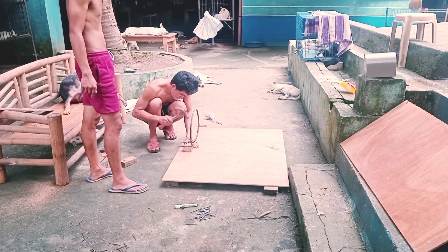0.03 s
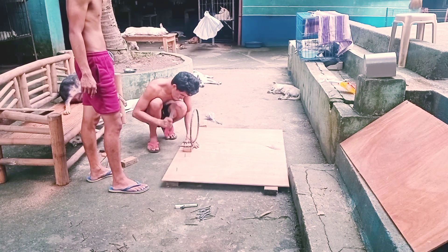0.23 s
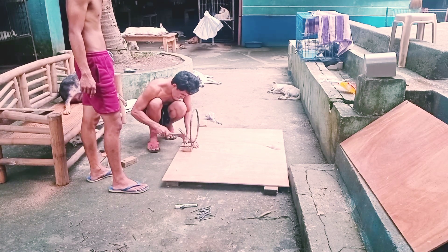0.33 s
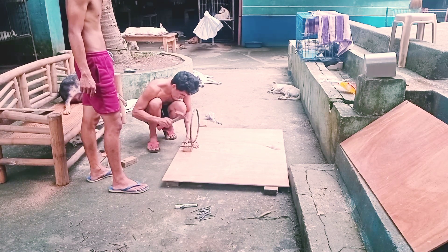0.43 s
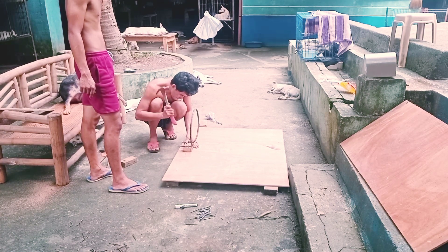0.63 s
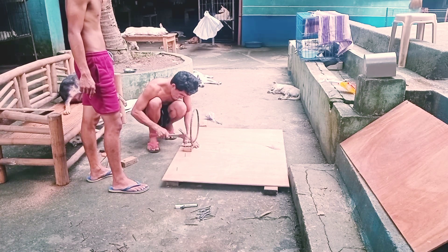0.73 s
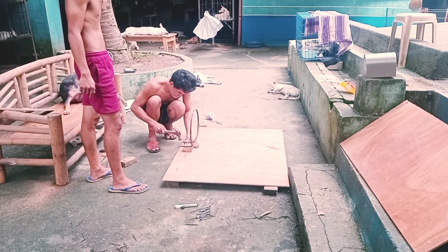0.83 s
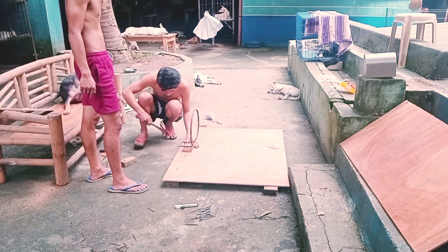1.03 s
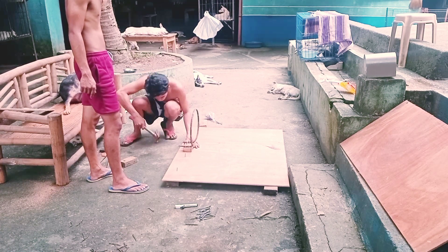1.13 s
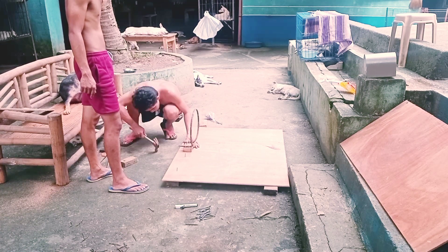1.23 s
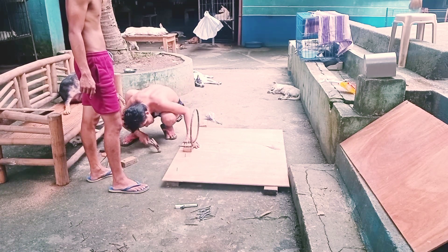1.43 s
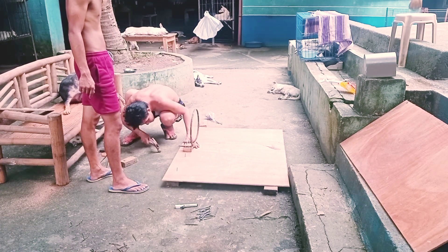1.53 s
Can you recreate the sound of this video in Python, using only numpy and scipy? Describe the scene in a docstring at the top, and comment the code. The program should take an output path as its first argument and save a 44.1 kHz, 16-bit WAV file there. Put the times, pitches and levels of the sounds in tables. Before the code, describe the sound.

A hammer bangs metal on a booming wooden sheet, followed by two light knocks.

```python
"""Hammering in a concrete yard

A hammer strikes a metal fitting on a plywood sheet in an even rhythm. Each blow cracks and clanks,
the sheet's modes boom and the walls reverberate, all held flat by a fast limiter. After a soft scuff,
tools are set down with two light knocks and faint clinks, over a low rumble and a thin hiss."""
import sys
import numpy as np
from scipy import signal
from scipy.fft import rfft, irfft, next_fast_len
from scipy.io import wavfile
from scipy.ndimage import uniform_filter1d

SR = 44100
rng = np.random.default_rng(int(sys.argv[2]) if len(sys.argv) > 2 else 0)


def dump_mix(stems):
    """Bounce the given channels to the path in sys.argv[1] as a 16-bit WAV at rate SR."""
    frames = np.atleast_2d(stems).T  # one column per channel
    limited = np.clip(frames, -1, 1)  # hard clip at full scale
    pcm = np.round(limited * 32767).astype(np.int16)
    wavfile.write(sys.argv[1], SR, pcm)


N = 70560
CRACK_RISE_S, YARD_RISE_S = 0.0036, 0.0076
SIDES = np.array([[0.5], [-0.5]])  # shares a difference between left and right

# The microphone pair. Each row: frequency in Hz, coherence, left minus right in dB, left lead in radians.
MIC_PAIR = [(31.1, 0, 1.5, 0), (103.4, .94, -0.5, 0), (352, 0.62, 0.9, 0.063), (594, 0.51, 0.2, 0.14),
            (1160, .55, 1, 1.3), (2250, 0, -0.5, 0.69), (5100, .05, 0.5, 2.2), (8640, 0.17, -9, 4.3),
            (9800, 0.18, 3.5, 1.5), (10900, 0.25, 14.5, 0.0026), (14400, 0.16, 1, 0.51)]


def amp(db):
    """Amplitude grows tenfold for every 20 dB."""
    return 10 ** (np.asarray(db) / 20)


def read(table, hz, column=1):
    """Interpolation of one column on a logarithmic frequency scale."""
    columns = np.transpose(table)
    return np.interp(np.log(hz + 1), np.log(columns[0]), columns[column])


def add(mix, start_s, sound):
    """Superposition: a stereo sound adds to the mix from its start time."""
    at = round(start_s * SR)
    sound = sound[:, max(-at, 0):]
    part = mix[:, max(at, 0):][:, :sound.shape[1]]
    part += sound[:, :part.shape[1]]


def noise(spectrum, size):
    """Partially coherent noise: left and right are most alike at long wavelengths."""
    hz = np.fft.rfftfreq(size, 1 / SR)
    a, b = rfft(rng.standard_normal((2, size)))
    coherence = np.clip(read(MIC_PAIR, hz), 0, 1)
    mid, side = a * np.sqrt((1 + coherence) / 2), b * np.sqrt((1 - coherence) / 2)
    return irfft(np.array([mid + side, mid - side]) * amp(read(spectrum, hz)), size) * np.sqrt(SR / 2)


def burst(bands, rise_s):
    """Frequency-dependent damping: each band of a noise falls 60 dB in its own time, T60."""
    t, hz = np.arange(SR) / SR, np.fft.rfftfreq(SR, 1 / SR)
    spectrum, out = rfft(noise(bands, SR)), 0
    centres_hz, _, t60s = np.transpose(bands)
    for t60, selector in zip(t60s, np.eye(len(bands))):
        band = read(np.c_[centres_hz, selector], hz)
        out = out + irfft(spectrum * band, SR) * amp(-60 * t / t60)
    return out * (1 - np.exp(-t / rise_s))


def ring(modes, rise_s, split=0, twin_share=0):
    """Free vibration: a sum of damped sines, each able to beat with a weaker, detuned twin."""
    t, out = np.arange(SR) / SR, 0
    for hz, db, t60 in modes:
        coherence = np.clip(read(MIC_PAIR, hz), 0, 1)
        phase_gap = np.arccos(coherence) * rng.choice([-1, 1]) / 2
        wave = np.exp(1j * (2 * np.pi * (hz * t + rng.random()) + phase_gap * SIDES))
        beat = 1 - twin_share * np.exp(2j * np.pi * hz * split * t)
        out = out + amp(db - 60 * t / t60) * (wave * beat).real
    return out * (1 - np.exp(-t / rise_s))


def background():
    """Ambient noise: a distant rumble sinks and returns under a steady, thin hiss."""
    # Noise spectra. Each row: frequency in Hz, density in dB per Hz.
    rumble = [(25, -120), (62, -108), (100, -88), (160, -90), (230, -103), (400, -114), (2000, -122),
              (5000, -140)]
    hiss = [(30, -121), (120, -112), (172, -93.5), (240, -114), (2000, -125), (5000, -137), (9900, -138),
            (10650, -114), (11200, -114), (11900, -134), (16000, -138)]
    # The rumble's course. Each row: time in seconds, gain in dB.
    rumble_level = [(0, 7), (0.202, -1.5), (.4, -11.5), (1.049, -11), (1.374, -27), (1.392, 3.5),
                    (1.46, 1.5), (1.6, -2)]
    gain_db = np.interp(np.arange(N) / SR, *np.transpose(rumble_level))
    return noise(rumble, N) * amp(gain_db) + noise(hiss, N)


def uneven_response(x, depth_db=1.5, spacing_hz=79.2):
    """The struck parts add random peaks and dips; minimum phase keeps the attack sharp."""
    size = 2 * x.shape[1]
    hz = abs(np.fft.fftfreq(size, 1 / SR))
    heights = rng.standard_normal(1000)
    ripple_db = depth_db * np.interp(hz / spacing_hz, np.arange(len(heights)), heights)
    response = np.exp(np.conj(signal.hilbert(np.log(amp(ripple_db)))))[:size // 2 + 1]
    response /= np.sqrt(np.mean(abs(response) ** 2))
    return irfft(rfft(x, size) * response, size)[:, :x.shape[1]]


def clatter():
    """Impact noise: brief contact gives a broadband crack; sheet rattle and yard echoes merge in a tail."""
    # Crack and tail. Each row: frequency in Hz, density in dB per Hz, T60 in seconds.
    crack = [(29.74, -71, .12), (150, -62, 0.19), (895, -46.5, 0.025), (2600, -33.5, 0.021),
             (4300, -44, .03), (6760, -55, 0.046), (10237, -57, 0.035), (11550, -45.5, .024),
             (16000, -50, 0.017)]
    tail = [(30.23, -77, .45), (68, -68, 0.45), (160, -53.5, 0.5), (289.3, -38.5, 0.49), (637, -44, 0.34),
            (1240, -44.5, 0.27), (2700, -51.5, 0.34), (4170, -60.5, .35), (7600, -65, .35),
            (9600, -69.5, 0.37), (12490, -61.5, 0.36), (16500, -74.5, 0.38)]
    return uneven_response(burst(crack, CRACK_RISE_S) + burst(tail, YARD_RISE_S))


def wall_slaps(low_cut_hz=170):
    """Early reflections: the nearest walls return the contact as short, dull slaps."""
    # One slap. Each row: frequency in Hz, density in dB per Hz, T60 in seconds.
    slap_bands = [(60, -72.5, 0.053), (346.8, -40.5, 0.011), (990, -36, 0.024), (2230, -47.5, 0.027),
                  (4440, -61, 0.017), (16000, -70, .02)]
    # Wall paths. Each row: delay in seconds, gain in dB, left minus right in dB.
    echoes = [(.0155, -1, 3.5), (.042, 1.5, -0.5), (0.062, -7, -3.5), (.086, -5, 0.5)]
    slap, out = burst(slap_bands, rise_s=0.0013), np.zeros((2, SR))
    for delay_s, db, pan_db in echoes:
        add(out, delay_s, slap * amp(db + pan_db * SIDES))
    return signal.sosfilt(signal.butter(2, low_cut_hz, "high", fs=SR, output="sos"), out)


def metal_clank():
    """Inharmonic modes of hammer and fitting die quickly, leaving a faint, diffuse ring."""
    # Metal modes. Each row: frequency in Hz, level in dB, T60 in seconds.
    modes = [(311, -29, 0.063), (576.6, -3.5, 0.062), (853, -17, .07), (1140, -13, 0.02),
             (1677, -15, 0.095), (2870, -16, 0.034), (4906, -18.5, .05), (11000, -15, 0.017)]
    # Diffuse ring. Each row: frequency in Hz, density in dB per Hz, T60 in seconds.
    after_ring = [(100, -130, .6), (885, -93, 1), (960, -78, 1), (1230, -79.5, 1), (1700, -84, .75),
                  (2000, -87.5, 0.5), (2200, -76.5, 1), (2600, -88.5, 1), (16000, -125, 0.57)]
    return ring(modes, CRACK_RISE_S) + burst(after_ring, YARD_RISE_S)


def sheet_boom(pitch, spot, split):
    """Coupled modes: close pairs in the plywood trade energy, so the boom swells and beats."""
    # Sheet modes. Each row: frequency in Hz, level in dB struck at spot 0, at spot 1, T60 in seconds.
    sheet = [(102.6, -33, -35.5, 0.35), (175.6, -28.5, -33, .33), (211.3, -20.5, -24.5, 0.4),
             (262.7, -21, -20.5, 0.43), (286.8, -8, -8.5, 0.4), (311.6, -16.5, -22, 0.28),
             (353.9, -23.5, -15.5, 0.38), (414.4, -16.5, -20.5, 0.34), (448, -22, -19.5, 0.23),
             (492.6, -15.5, -22.5, 0.31), (608.5, -15.5, -20, 0.29), (731, -34.5, -31, 0.45),
             (836.6, -19, -27.5, .26), (886, -23, -24.5, 0.31), (1057.4, -29.5, -18.5, .26),
             (1245.5, -25, -26, 0.34), (1292, -14.5, -26, 0.25), (1753, -27, -25, 0.36)]
    modes = [(hz * pitch, levels_db[spot], t60) for hz, *levels_db, t60 in sheet]
    return ring(modes, rise_s=0.033, split=split, twin_share=0.53)


def scuff(length_s, left_db=-8):
    """Amplitude-shaped noise: a brief swell of dry hiss, mostly on the right."""
    # The scuff's spectrum. Each row: frequency in Hz, density in dB per Hz.
    colour = [(300, -118), (1000, -110), (3000, -111), (6000, -115), (9500, -117), (12000, -111),
              (16000, -120)]
    size = int(length_s * SR)
    return np.hanning(size) * noise(colour, SR)[:, :size] * amp([[left_db], [0]])


def knock(low_hz, high_hz, slope_db, lead_s):
    """A damped impact: a tool on concrete sends out one band-limited pulse, followed by reflections."""
    # Ground scatter and wall echo. Each row: frequency in Hz, density in dB per Hz, T60 in seconds.
    ground = [(196, -71, 0.055), (980, -66.5, 0.048), (8000, -61, 0.027)]
    walls = [(170.6, -68.5, 0.4), (444, -77.5, 0.29), (990, -76.5, 0.19), (7840, -69, 0.165)]
    paths = burst(ground, rise_s=0.00051) + burst(walls, rise_s=0.015)
    paths[:, 0] += 1  # direct sound
    paths = np.roll(paths, round(lead_s * SR), axis=1)
    hz = np.fft.rfftfreq(SR, 1 / SR)
    high_pass = hz ** 2 / (hz ** 2 + low_hz ** 2)
    low_pass = 1 / (1 + amp(slope_db * np.log2((hz + 1) / high_hz)))
    return irfft(rfft(paths) * high_pass * low_pass, SR)


def clink(hz, db, t60, half_width=0.027):
    """A narrow resonance driven by a noise burst gives a rough, pitched clink."""
    edges_hz = [hz * (1 - half_width), hz * (1 + half_width)]
    resonance = signal.butter(2, edges_hz, "band", fs=SR, output="sos")
    return signal.sosfilt(resonance, burst([(hz, db, t60)], rise_s=0.003))


def scene():
    """The pressures of background, blows, scuff, knocks and clinks add linearly."""
    # Hammer blows, the first already dying away. Each row: start in seconds, gain in dB,
    # pitch factor of the sheet, spot struck (0 or 1), relative split of the mode pairs.
    blows = [(-.2, -3.5, 1.007, 1, .018), (0.2322, -4.5, 1.006, 0, 0.018), (0.6665, -3.5, .996, 1, .0205)]
    # Tools set down. Each row: time in seconds, gain in dB, lower and upper corner in Hz,
    # treble roll-off in dB per octave.
    knocks = [(1.081, -3, 500, 1670, 20), (1.131, -25.5, 596, 1800, 25), (1.2103, 5, 509, 1300, 39),
              (1.273, -20, 399.5, 1144, 38)]
    # Faint clinks. Each row: start in seconds, frequency in Hz, density in dB per Hz, T60 in seconds.
    clinks = [(1.208, 5100, -103, .12), (1.489, 2090, -99, 0.1)]
    mix = background()
    for start_s, db, pitch, spot, split in blows:
        blow = clatter() + wall_slaps() + metal_clank() + sheet_boom(pitch, spot, split)
        add(mix, start_s, amp(db) * blow)
    add(mix, start_s=1.017, sound=scuff(length_s=0.085))
    lead_s = 0.01  # room for a knock's soft leading edge
    for time_s, db, *band in knocks:
        add(mix, time_s - lead_s, amp(db) * knock(*band, lead_s))
    for start_s, hz, db, t60 in clinks:
        add(mix, start_s, clink(hz, db, t60))
    return mix


def limiter(x, threshold_db=-21, share=0.91, recovery_db_per_s=101):
    """Dynamic compression: gain drops by a share of the excess level, then recovers at a steady rate."""
    power_db = 10 * np.log10(abs(uniform_filter1d((x ** 2).mean(0), size=260)) + 1e-12)
    fall_db = np.arange(N) * recovery_db_per_s / SR
    held_db = np.maximum.accumulate(power_db + fall_db) - fall_db
    excess_db = np.maximum(held_db - threshold_db, 0)
    return x * amp(-share * uniform_filter1d(excess_db, size=90))


def record(dry, cutoff_hz=16000):
    """Stereo pickup: two microphones differ in level and phase; a limiter and a low-pass follow."""
    size = next_fast_len(N + SR // 10)
    hz = np.fft.rfftfreq(size, 1 / SR)
    balance = amp(SIDES * read(MIC_PAIR, hz, column=2))
    phase = SIDES * read(MIC_PAIR, hz, column=3)
    picked_up = irfft(rfft(dry, size) * balance * np.exp(1j * phase), size)[:, :N]
    low_pass = signal.firwin(511, cutoff_hz, window=("kaiser", 9), fs=SR)
    return signal.oaconvolve(limiter(picked_up), low_pass[None], "same")


dry = scene()
out = record(dry)
dump_mix(out)
```